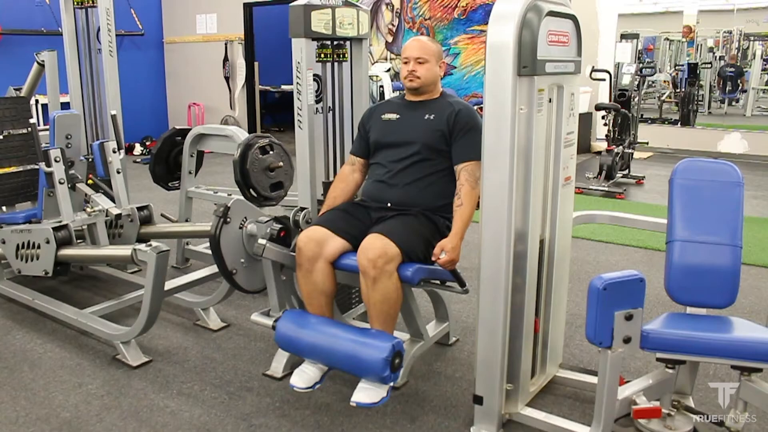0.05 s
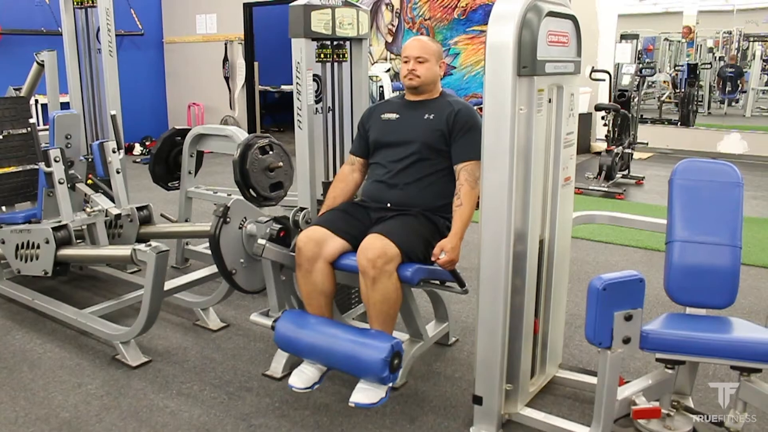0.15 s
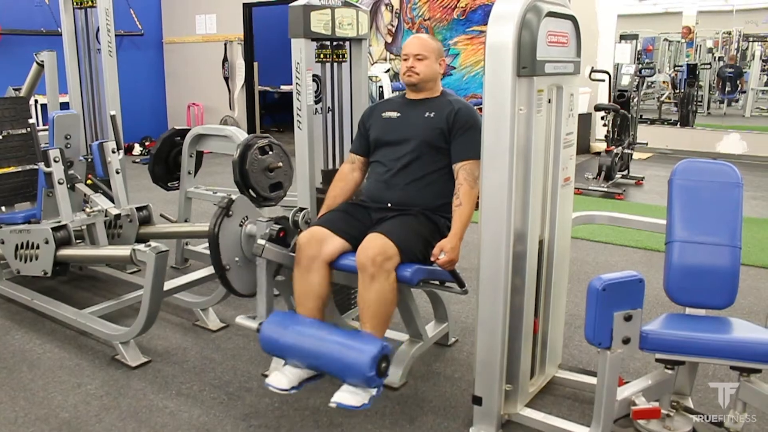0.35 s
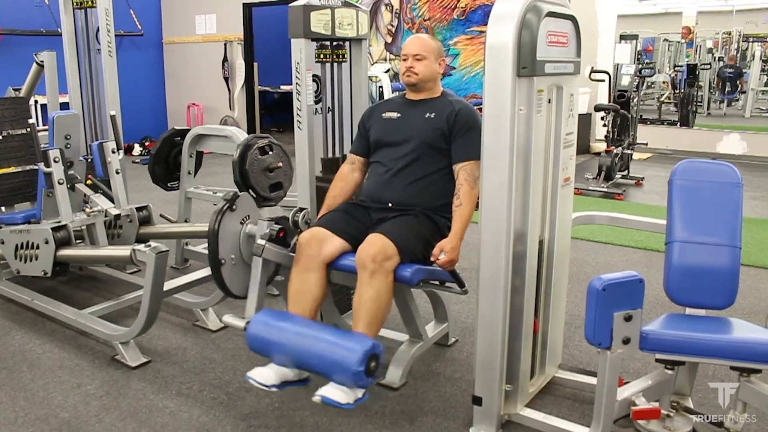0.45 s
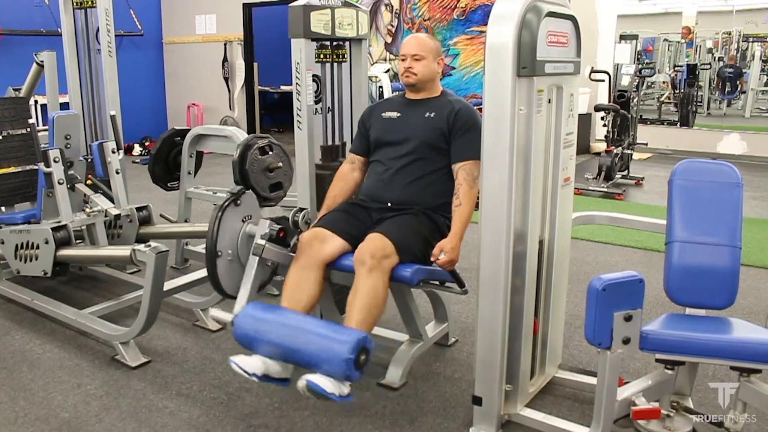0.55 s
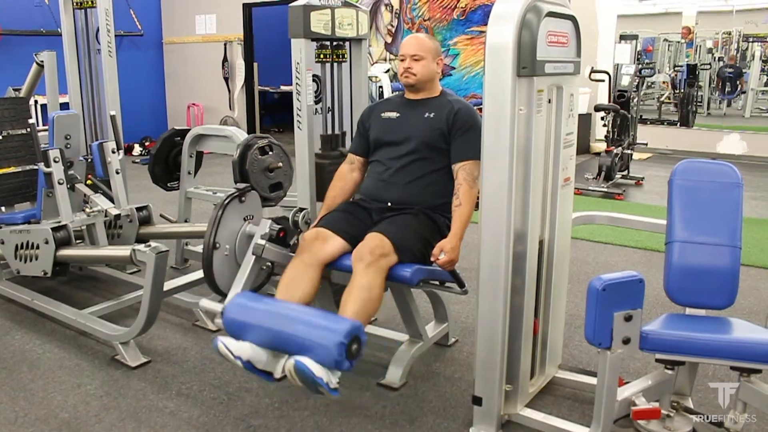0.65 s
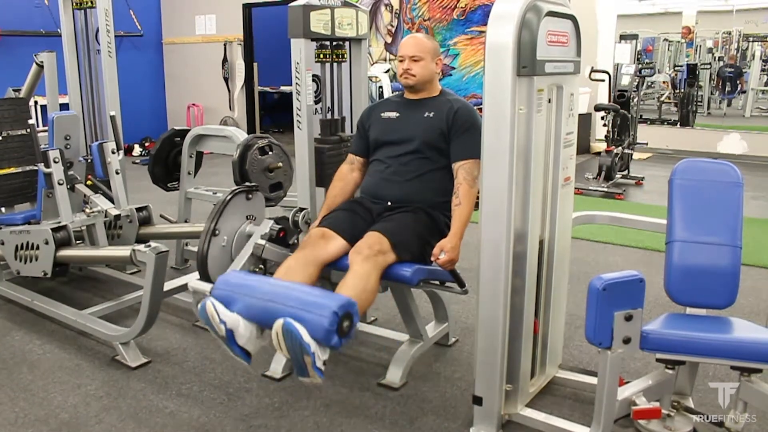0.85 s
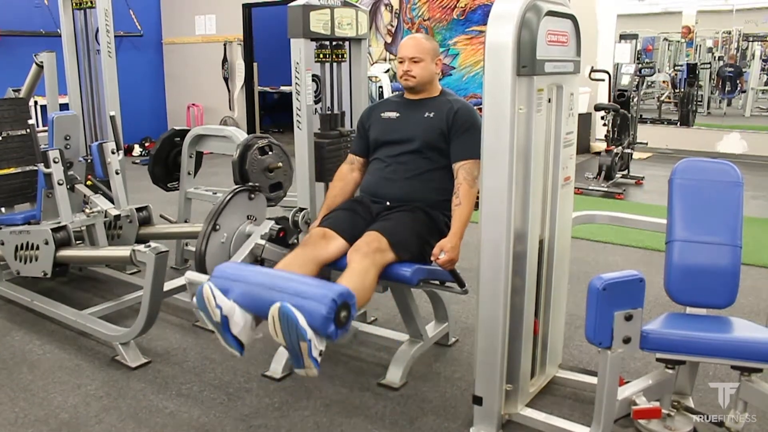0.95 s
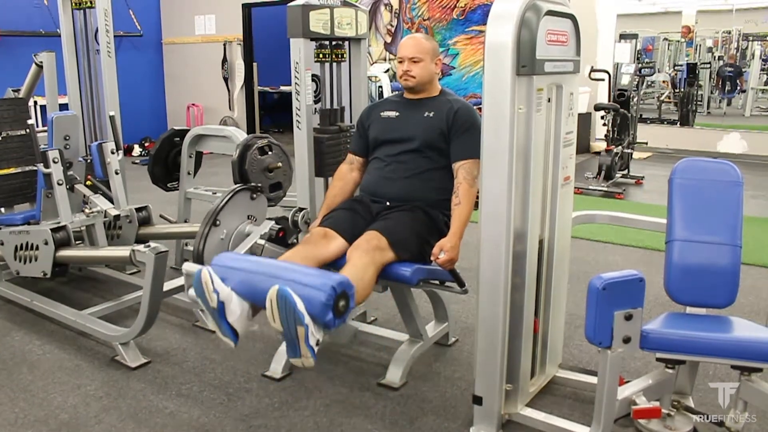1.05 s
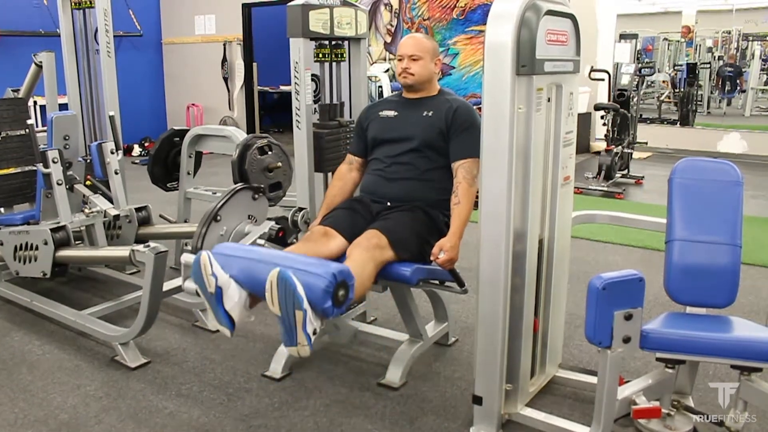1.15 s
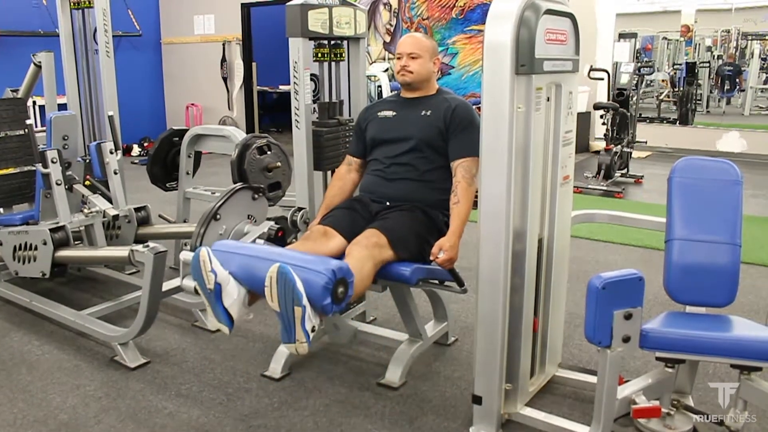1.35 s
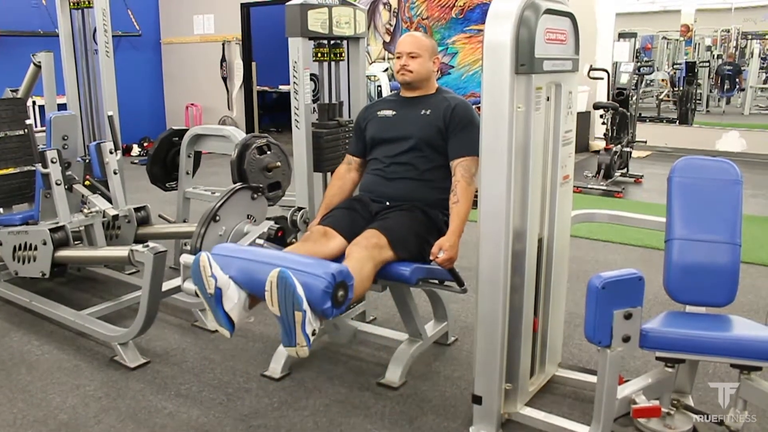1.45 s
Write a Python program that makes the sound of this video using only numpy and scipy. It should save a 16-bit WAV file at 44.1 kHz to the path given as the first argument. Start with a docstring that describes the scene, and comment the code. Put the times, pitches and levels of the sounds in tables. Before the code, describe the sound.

Weight stack clank, short and dull-bright, preceded by a light plate rattle and followed by chatter, a bouncing pin knock and sparse dry ticks; reverberant gym hall, steady low air rumble, faint hiss, centered microphone pickup.

```python
"""Weight machine starting to move

In a large gym loose plates and a guide collar rattle, the stack lifts with one clank, a pin knocks and the
lever joints tick. Each metal blow is a burst of tiny collisions that rings clusters of decaying sines and
adds a broadband crack; scattered echoes with band-dependent decay make the hall. Shaped noise is the rumble of
ventilation and far machines, white noise the microphone hiss. The sound opens after a short silence."""
import sys
import numpy as np
from scipy import signal
from scipy.io import wavfile
from scipy.ndimage import uniform_filter1d

SR = 44100
rng = np.random.default_rng(int(sys.argv[2]) if len(sys.argv) > 2 else 0)


def field_ratio(decibels):
    """Amplitude ratio for a level in dB (20 dB per decade); scalars and array-likes work."""
    return 10 ** (np.asarray(decibels, dtype=float) / 20)


def waveform_to_disk(signal):
    """Save audio, clipped to [-1, 1], as 16-bit WAV at the path in sys.argv[1]."""
    frames = np.transpose(np.atleast_2d(signal))
    scaled = np.clip(frames, -1, 1) * 32767
    samples = np.round(scaled).astype(np.int16)
    wavfile.write(sys.argv[1], SR, samples)


N = 66150  # samples, 1.5 s

# Blows. Columns: [t/s, peak level before the hall/dB, contact length/s, crack level against the ring/dB]
# the stack lifts, striking twice
STACK_BLOWS = [(.2885, -11, 0.0018, -1), (.2915, -8, 0.0036, 3.5)]
# the pin knocks and bounces
PIN_BLOWS = [(.6152, -19, 0.0041, -5), (.6215, -24.5, 0.0083, -1), (.631, -29.5, 0.0017, 3)]
# loose plates rattle
PLATE_BLOWS = [(.0555, -41, 0.043, -1.5), (.2372, -24.5, 0.01, -3), (.333, -35, 0.011, -1)]
# the guide collar chatters
COLLAR_BLOWS = [(.447, -25, 0.019, -1), (.492, -33, 0.021, -2)]
# lever joints tick. Columns: [t/s, peak level before the hall/dB, ring f/Hz, crack level against the ring/dB,
# low thud level against the ring mode/dB, bright ring level against the ring mode/dB]
JOINT_TICKS = [(.55, -37.5, 1750, 4, -25, -20), (0.5611, -34.5, 2620, -6, -1, -12.5),
               (0.5763, -37.5, 1760, -1, -27, -13), (0.5867, -35.5, 1760, -8, -7, -20),
               (.598, -33.5, 1500, 3, -19, -6), (0.6096, -32, 2420, -10, -15, -21),
               (.69, -40, 2770, 10, -7, -13), (0.7053, -26.5, 1320, -6.5, -11.5, -9),
               (.727, -39.5, 3120, 9, -22, -18), (.936, -42.5, 2620, -3, -30, -20),
               (0.997, -43.5, 2500, 12, -10, -15), (1.058, -40, 3380, -3, -2, -13),
               (1.135, -38.5, 1670, -1, -17, -4), (1.1995, -33.5, 2890, -16, -11, -25),
               (1.2073, -31.5, 2800, 6, -14, -13.5), (1.22, -23, 3420, -1, 6, 13.5),
               (1.247, -28.5, 2350, -3, 1, -25), (1.255, -37.5, 1820, -12, -14, -22),
               (1.2798, -39.5, 1610, -2, -22, -3), (1.29, -38, 1960, -14, -12, -10),
               (1.361, -46, 1350, 4, -17, -10)]

# Modes of the metal parts. Columns: [f/Hz, relative level/dB, t60/s]
# weight stack
STACK_MODES = [(365.5, 4, 0.18), (599.5, -7, 0.54), (680.6, 4.5, 0.19), (794, 2.5, 0.16), (1427, 8, 0.04),
               (1577, 6, 0.046), (2083, 0, .05), (2890, -9, 0.031), (3120, -1.5, 0.11), (3260, -12, 0.066),
               (4474, 7, 0.042), (5220, 1.5, 0.017), (6520, -5, .015)]
# pin
PIN_MODES = [(620, -4.5, 0.12), (1500, -4, 0.066), (2356, -1.5, 0.029), (2590, 11, 0.021),
             (3023, 7.5, 0.025), (3303, 5.5, 0.041), (3470, -20, .04), (4470, -2.5, 0.025), (5500, -2, .01)]
# loose plates
PLATE_MODES = [(1458, 1.5, 0.061), (1610, -5, 0.043), (2500, -36, 0.052), (2970, -2.5, 0.09),
               (3230, -14, 0.16), (4200, -19, 0.06), (5380, -4, 0.022), (6980, 0.5, 0.012),
               (8700, 1, 0.0069), (11500, 1.5, 0.0039), (15000, -11, .005)]
# guide collar
COLLAR_MODES = [(1390, -14, 0.089), (1527, -4, 0.046), (2660, -8.5, 0.084), (3280, -8.5, 0.053),
                (4470, -15, 0.12), (4930, -12, 0.069), (7250, -5, 0.016), (9200, -8.5, 0.0066)]

# spectrum of the crack of one collision. Columns: [f/Hz, relative level/dB]
CRACK_SPECTRUM = [(100, -61), (400, -26.5), (900, 9), (2000, 6.5), (3200, 13.5), (5000, -0.5), (9000, -7.5),
                  (16000, -26.5)]
# decay of the hall. Columns: [f/Hz, t60/s]
HALL_DECAY = [(250, 1), (660, 0.94), (1740, 0.45), (3500, 0.5), (7000, 0.39), (14000, 0.36)]
# spectrum of ventilation and far machines. Columns: [f/Hz, relative level per Hz/dB]
AIR_SPECTRUM = [(15, -48), (25, -3.5), (87, -2.5), (157, 2.5), (195, 2.5), (250, -3.5), (320, -9),
                (360, -1.5), (400, -9.5), (560, -6.5), (800, -14), (1100, -16), (2000, -27.5),
                (3100, -24.5), (4200, -33), (6000, -38), (9000, -39.5), (16000, -48)]


def read(points, hz):
    """Reads a table on a log-frequency axis."""
    f, value = np.transpose(points)
    return np.interp(np.log(hz + 1), np.log(f + 1), value)


def evened(x):
    """Scales to rms 1."""
    return x / np.sqrt(np.mean(x ** 2) + 1e-20)


def unit_energy(x):
    """Scales each row to energy 1."""
    return x / np.linalg.norm(x, axis=-1, keepdims=True)


def add(mix, s, sound):
    """Mixes a sound in at time s, cut off where the mix ends."""
    part = mix[round(s * SR):][:len(sound)]
    part += sound[:len(part)]


def struck(blows, modes):
    """One metal part ringing at every blow in its table."""
    out = np.zeros(N)
    for s, peak_db, contact_s, crack_db in blows:
        add(out, s, blow(modes, peak_db, contact_s, crack_db))
    return out


def stack_clank():
    """The lifting stack strikes twice in quick succession and rings in its modes."""
    return struck(STACK_BLOWS, STACK_MODES)


def pin_knocks():
    """The pin knocks and bounces, ringing briefly each time."""
    return struck(PIN_BLOWS, PIN_MODES)


def plate_rattle():
    """Loose plates rattle in bursts of contacts."""
    return struck(PLATE_BLOWS, PLATE_MODES)


def collar_chatter():
    """The guide collar chatters in bursts of contacts."""
    return struck(COLLAR_BLOWS, COLLAR_MODES)


def joint_ticks():
    """Lever joints tick: a short ring, a bright ring and a low thud of two modes."""
    ring_s, contact_s = 0.0059, 0.0026
    bright_hz, bright_s = 8500, 0.00093
    thud_hz, upper_thud_ratio, thud_s = 302.4, 2.57, 0.027
    out = np.zeros(N)
    for s, peak_db, hz, crack_db, thud_db, bright_db in JOINT_TICKS:
        modes = [(hz, 0, ring_s),
                 (bright_hz, bright_db, bright_s),
                 (thud_hz, thud_db, thud_s),
                 (thud_hz * upper_thud_ratio, thud_db, thud_s)]
        add(out, s, blow(modes, peak_db, contact_s, crack_db))
    return out


def blow(modes, peak_db, contact_s, crack_db):
    """Collisions ring the object and crack in the air; the hall answers a single collision with its own scatter."""
    hall_db = -10.5
    hits, rows, click = contacts(contact_s), ring(modes), crack()
    # a mode's energy grows with its decay time
    share = np.array([field_ratio(db) * np.sqrt(t60) for hz, db, t60 in modes])[:, None]
    crack_size = field_ratio(crack_db) * np.linalg.norm(share)

    direct = (share * unit_energy(signal.fftconvolve(hits[None], rows, axes=1))).sum(axis=0)
    add(direct, 0, crack_size * unit_energy(signal.fftconvolve(hits, click)))

    single = (share * unit_energy(rows)).sum(axis=0)
    add(single, 0, crack_size * unit_energy(click))

    out = field_ratio(hall_db) * hall(single)
    add(out, 0, direct)
    # peak of a sine with the loudest short-time rms (200 samples) of the direct sound
    peak = np.sqrt(2 * uniform_filter1d(direct ** 2, 200).max())
    return field_ratio(peak_db) * out / peak


def contacts(length_s):
    """A burst of tiny collisions that holds, stops and leaves a weaker chatter; the first is always there."""
    contacts_per_s, spread_db = 7000, 1.5
    rise_s, head_start_s = 0.0013, 0.0009
    after_db, after_times = -14.5, 4.36  # the weaker chatter and its decay in contact lengths
    chance, strength, side = rng.random((3, 4096))
    t = np.arange(4096) / SR
    hit = (chance < contacts_per_s / SR) | (t == 0)
    size = field_ratio(-spread_db * np.log(1 - strength * .95)) * np.sign(side - .5)
    rise = np.minimum((t + head_start_s) / rise_s, 1)
    burst = np.exp(-(t / length_s) ** 2)
    chatter = field_ratio(after_db) * np.exp(-t / (after_times * length_s))
    return hit * size * rise * (burst + chatter)


def ring(modes, count=14):
    """Decaying sines of one object, one row per mode, each a cluster of close neighbours."""
    neighbour_spread = 0.0601  # standard deviation as a fraction of the mode's frequency
    swing_in_cycles = 1  # build-up time constant, so the low modes come late
    t = np.arange(SR // 4) / SR
    offsets, signs = rng.standard_normal((2, len(modes), count, 1))
    rows = []
    for (hz, _, t60), offset, sign in zip(modes, offsets, np.sign(signs)):
        cluster_hz = hz * (1 + neighbour_spread * offset)
        cluster = (sign * np.sin(2 * np.pi * cluster_hz * t)).sum(axis=0)
        decay = 10 ** (-3 * t / t60)
        build_up = 1 - np.exp(-t * hz / swing_in_cycles)
        rows.append(decay * build_up * cluster)
    return np.array(rows)


def crack():
    """The broadband click of one collision, minimum phase so that nothing sounds before the hit."""
    hz = abs(np.fft.fftfreq(1024, 1 / SR))
    log_gain = np.log(field_ratio(read(CRACK_SPECTRUM, hz)))
    response = np.exp(np.conj(signal.hilbert(log_gain)))
    return np.fft.ifft(response).real[:256]


def hall(x):
    """Sparse taps of random sign after a gap, each band dying at its own speed."""
    gap_s, spacing = .004, 20  # one tap in every 20 samples
    taps = np.zeros(SR // 2)
    at = np.arange(0, len(taps) - spacing, spacing)
    taps[at + rng.integers(0, spacing, len(at))] = rng.choice([-1., 1.], len(at))
    taps[:round(gap_s * SR)] = 0
    hz, t, z = signal.stft(taps, SR, nperseg=256)
    decay = field_ratio(-60 * t / read(HALL_DECAY, hz)[:, None])
    tail = signal.istft(z * decay, SR, nperseg=256)[1]
    return signal.fftconvolve(x, unit_energy(tail))


def air():
    """Ventilation and far machines: noise with drifting patches and a slow swell."""
    level_db, patchy_db, swell_db = -38, 1, 0.5  # rms
    frames, hz = N // 512 + 5, np.fft.rfftfreq(2048, 1 / SR)
    real, imaginary, patches = rng.standard_normal((frames, 1025, 3)).T
    patches = uniform_filter1d(patches, 8, axis=0)  # smooth over frequency
    patches = evened(uniform_filter1d(patches, 4, axis=1))  # then over time
    swell = evened(uniform_filter1d(rng.standard_normal(frames), 6))
    gain_db = read(AIR_SPECTRUM, hz)[:, None] + patchy_db * patches + swell_db * swell
    z = (real + 1j * imaginary) * field_ratio(gain_db)
    noise = signal.istft(z, nperseg=2048, noverlap=1536)[1][:N]
    return field_ratio(level_db) * evened(noise)


def microphone_hiss(shape):
    """White noise, unrelated in each channel."""
    return field_ratio(-56) * rng.standard_normal(shape)  # rms/dB, full band


def scene():
    """Machine and air, straight ahead: the same in both channels."""
    machine = plate_rattle() + collar_chatter() + stack_clank() + pin_knocks() + joint_ticks()
    return np.tile(machine + air(), (2, 1))


def roll_off(x):
    """The treble ends steeply here."""
    return signal.sosfilt(signal.butter(12, 16530, fs=SR, output="sos"), x)


def record(dry):
    """Adds microphone hiss, limits the band and opens the sound after a short silence."""
    edge_hz, start_s, fade_in_s = 16000, 0.055, 0.00049
    x = dry + microphone_hiss(dry.shape)
    low_pass = signal.firwin(1023, edge_hz, window=("kaiser", 9), fs=SR)
    x = signal.oaconvolve(x, low_pass[None], "same")
    mix = x * np.clip((np.arange(N) / SR - start_s) / fade_in_s, 0, 1)
    return roll_off(mix)


dry = scene()
out = record(dry)
waveform_to_disk(out)
```